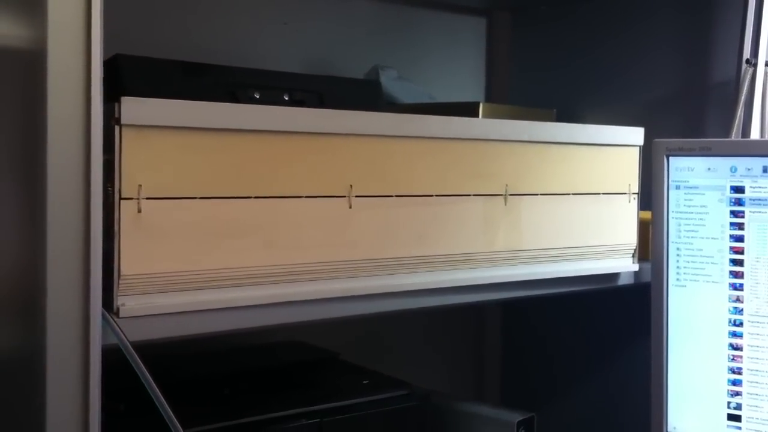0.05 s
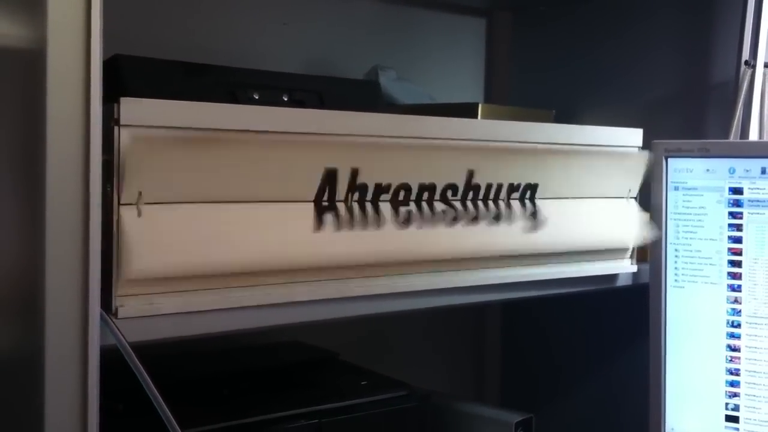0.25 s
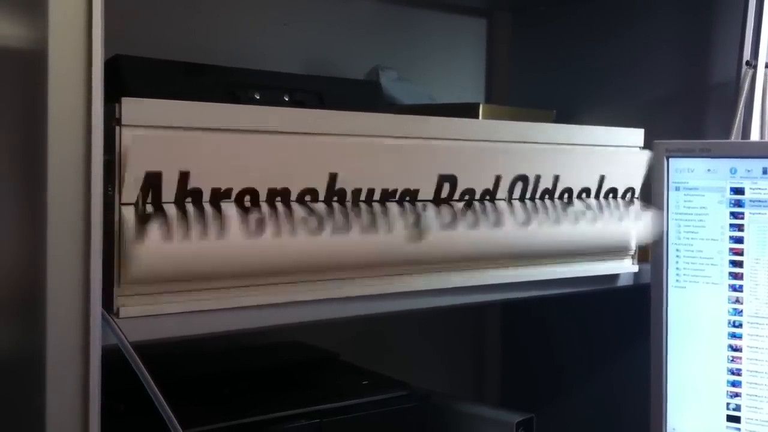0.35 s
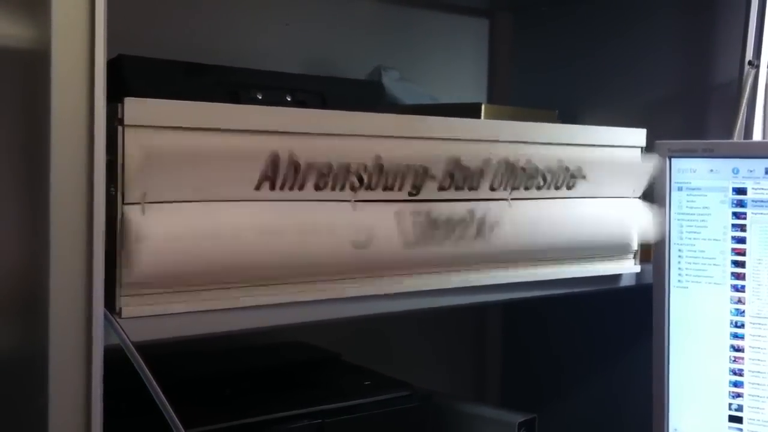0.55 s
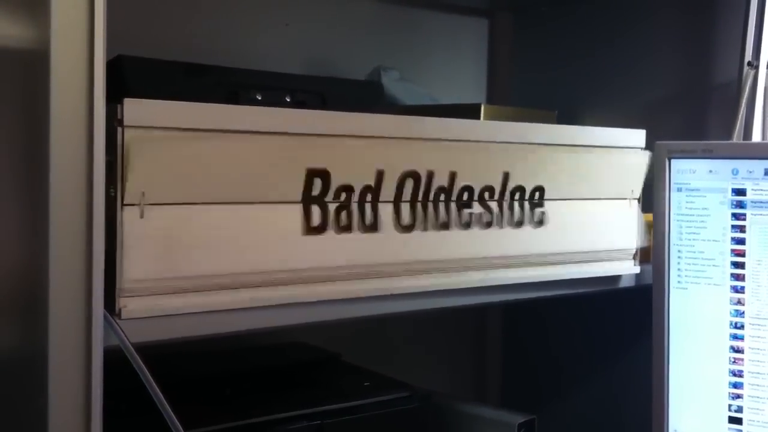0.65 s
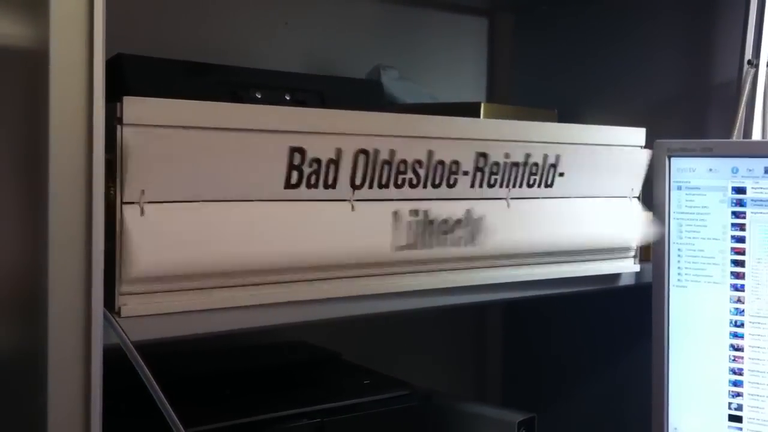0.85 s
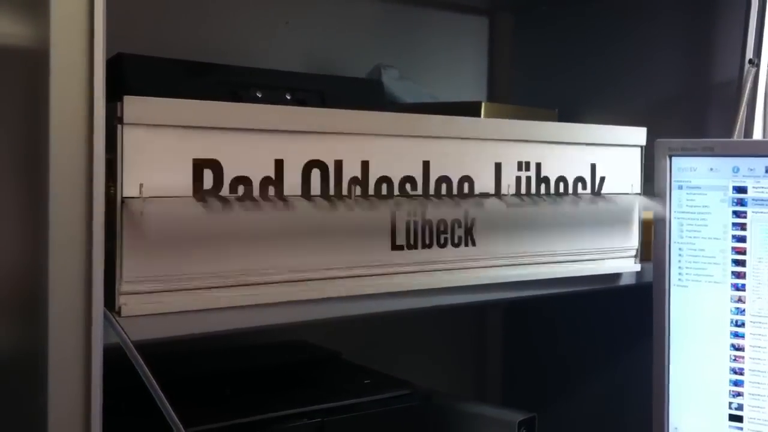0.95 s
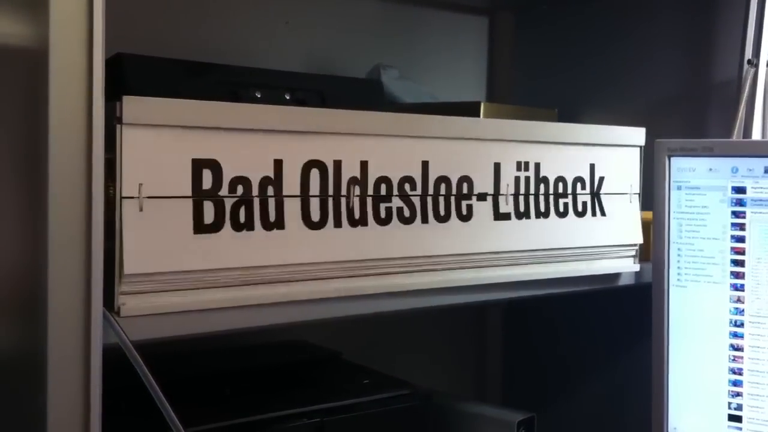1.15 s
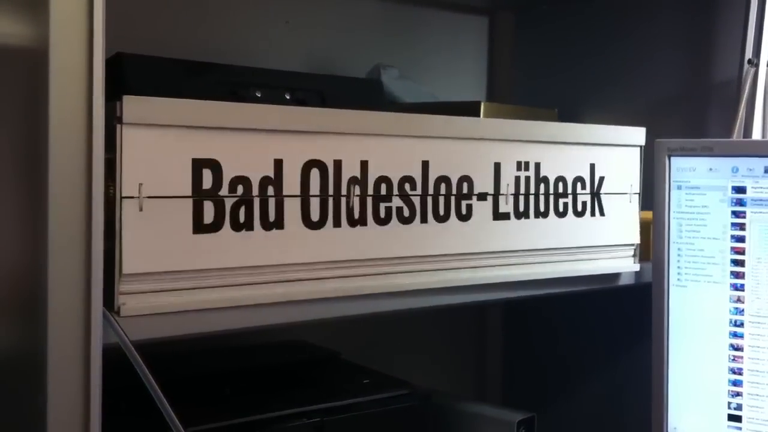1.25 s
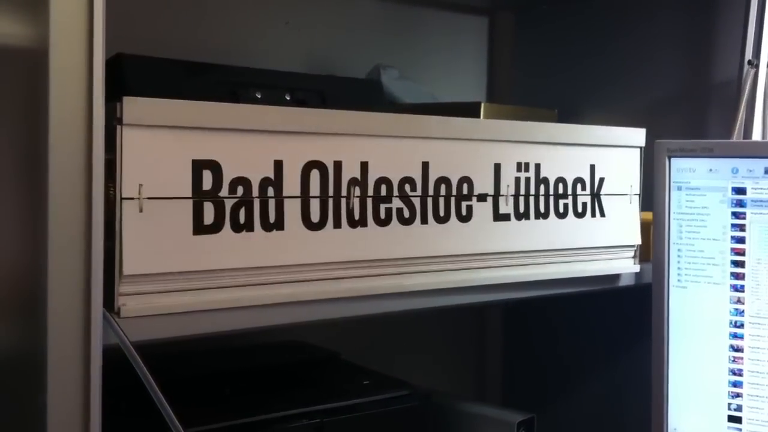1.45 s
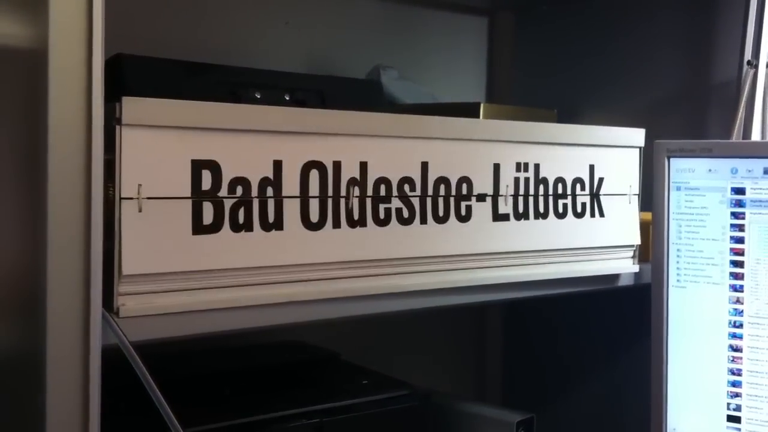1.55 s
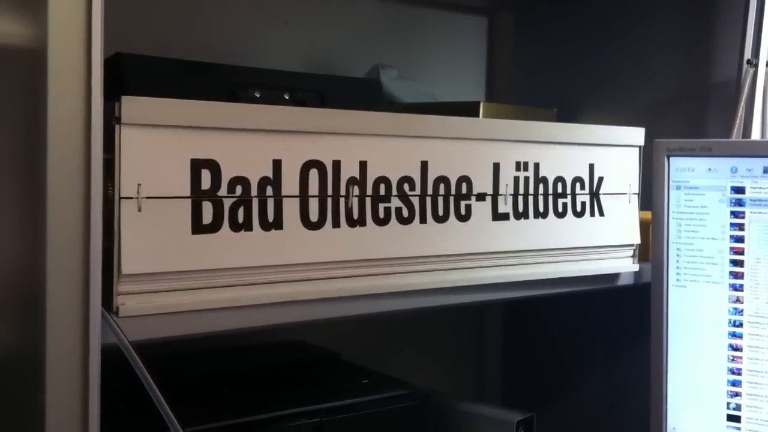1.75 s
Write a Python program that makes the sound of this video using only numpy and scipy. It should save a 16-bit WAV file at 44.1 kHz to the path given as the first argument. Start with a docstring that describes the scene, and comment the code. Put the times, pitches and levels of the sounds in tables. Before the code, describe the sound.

A split-flap sign in a quiet small room, heard close. Faint hiss until 0.2 s, then a geared motor whirrs with a fluctuating metallic ring around sharp, bright clacks and duller flap slaps, irregular, several per second, loudest near 0.4 and 0.8 s. The motor cuts at 1.0 s with a last clack and short room tail. A soft loose-flap tick follows at 1.14 s, then hiss and a barely audible low thump near 1.7 s.

```python
"""A wide split-flap sign in a quiet room runs through its flaps and stops; one loose flap settles last.
Its geared drive excites the housing modes by random tooth impacts. Sharp clacks of flaps leaving their
catches are noise bursts through resonances. Each flap slaps the stack as a swell of taps over a decaying
thud and knock. Jolts ping an upper mode, slaps push air, sparse echoes form the room, and shaped noise
with one faint thump lies behind."""
import sys
import numpy as np
from scipy import signal
from scipy.fft import rfft, irfft
from scipy.io import wavfile
from scipy.ndimage import uniform_filter1d

SR = 44100
rng = np.random.default_rng(int(sys.argv[2]) if len(sys.argv) > 2 else 0)


def to_wav(sig):
    """Store sig (one row per channel, or 1-D mono) as 16-bit WAV at the path in sys.argv[1].

    Samples outside -1..1 are clipped; the rate is SR.
    """
    pcm = np.clip(np.atleast_2d(sig), -1, 1) * 32767
    pcm = np.round(pcm).astype(np.int16)
    wavfile.write(sys.argv[1], SR, pcm.T)  # frames by channels


def magnitude_from_level(level_db):
    """Linear magnitude for a level in decibels (20 dB per decade)."""
    exponent = np.asarray(level_db, float) / 20
    return 10 ** exponent


N = 79380  # length [samples]

STEADY = 0.3  # how far a ring's level is held steady, 0-1

DRIVE_ON_S, DRIVE_OFF_S, HUM_RISE_S = 0.1823, 0.99, 0.11
TEETH_PER_S, TOOTH_SPREAD_DB = 1200, 1.5  # mean impact rate, mean excess level
WHINE_DB, GEAR_HISS_DB, HUM_DB = -37, -39, -47.5
UPPER_HZ, UPPER_WIDTH_HZ, UPPER_DB = 2142, 133, -45.5  # upper housing mode
# Ring of the lower housing modes: (time [s], level [dB])
RING_LEVEL = [(.19, -39), (0.214, -32), (0.243, -34.5), (.3, -37), (.39, -37.5), (0.436, -29.5),
              (.49, -39.5), (0.549, -44), (0.586, -25), (0.648, -50.5), (.69, -29.5), (.72, -36),
              (.83, -38.5), (.915, -35.5), (.99, -33)]
# Lower housing modes: (frequency [Hz], pole width [Hz], relative level [dB])
LOWER_MODES = [(1300, 820, -14), (1470, 31, -6.5), (1590, 37.4, -0.5), (1650, 40, -7.5)]
# Low box modes: (frequency [Hz], pole width [Hz], relative level [dB])
BOX_MODES = [(130.4, 10, 10), (181.5, 26, 16), (329, 49, 11.5), (783.4, 69, 9), (1093, 82, 2)]
# Spectrum of the gear hiss: (frequency [Hz], relative density [dB per Hz])
GEAR_HISS = [(200, -21.5), (1000, 0.5), (2500, 1.5), (4000, -9), (7000, -21), (16000, -8.5)]


def drive():
    """Forced vibration: random gear-tooth impacts excite the housing modes while the motor runs."""
    t = np.arange(N) / SR
    starting = np.clip((t - DRIVE_ON_S) / 0.0023, 0, 1)
    stopping = np.clip((DRIVE_OFF_S - t) / 0.0033, 0, 1)
    spun_up = np.clip((t - DRIVE_ON_S) / HUM_RISE_S, 0, 1) ** 2
    teeth = ticks(TEETH_PER_S, TOOTH_SPREAD_DB)
    ring_s, ring_db = np.transpose(RING_LEVEL)
    ring = magnitude_from_level(np.interp(t, ring_s, ring_db)) * modes(teeth, LOWER_MODES, STEADY)
    ring += magnitude_from_level(UPPER_DB) * modes(teeth, [(UPPER_HZ, UPPER_WIDTH_HZ, 0)])
    hum = magnitude_from_level(HUM_DB) * modes(teeth, BOX_MODES)
    hiss = magnitude_from_level(GEAR_HISS_DB) * colour(teeth, GEAR_HISS)
    return starting * stopping * (ring + magnitude_from_level(WHINE_DB) * whine(teeth) + spun_up * (hum + hiss))


FLICKER_DB, FLICKER_S = 5, 0.036  # rms level swing, averaging time of its noise
# Thin gear modes: (frequency [Hz], pole width [Hz], relative level [dB])
GEAR_MODES = [(5740, 1160, 2.5), (7060, 480, 3), (9380, 1100, 3), (14300, 540, -2.5)]


def whine(teeth):
    """Amplitude modulation: each thin gear mode flickers independently, following slow noise."""
    noise = rng.standard_normal((len(GEAR_MODES), N))
    slow = uniform_filter1d(noise, round(FLICKER_S * SR), axis=1)
    out = np.zeros(N)
    for wander, row in zip(slow, GEAR_MODES):
        out += magnitude_from_level(FLICKER_DB * evened(wander) + row[2]) * modes(teeth, [row])
    return evened(out)


PING_S = 0.0031  # time from onset to the envelope's peak
# Single jolts: (time [s], envelope peak [dB])
PINGS = [(.2385, -21.5), (.342, -22.5), (.6274, -28), (.7511, -25)]


def pings():
    """Impulse response: a jolt in the gear train strikes the upper housing mode."""
    t, out = np.arange(2000) / SR, np.zeros(N)
    envelope = t / PING_S * np.exp(1 - t / PING_S)
    for s, peak_db in PINGS:
        add(out, s, magnitude_from_level(peak_db) * envelope * np.sin(2 * np.pi * UPPER_HZ * t))
    return out


CLACK_RISE_S, CRACK_S, RATTLE_T60_S = 0.0006, 0.0092, 0.07  # the crack is 60 dB down after CRACK_S
BROAD_DB, OWN_RING_DB, RATTLE_DB = -8, -2, -13  # unpitched part, strongest ring, rattle
OWN_WIDTH_HZ = 400
# Modes of a flap: (frequency [Hz], pole width [Hz], relative level [dB])
FLAP_MODES = [(1770, 410, -7), (3460, 460, -3.5), (4995, 519, 4), (6220, 1330, 0.5), (6770, 2350, 9),
              (12040, 1400, 1)]


def clack(peak_db, ring_hz):
    """Modal resonance: a burst of contacts rings the flap, one mode more strongly, then rattles out."""
    t = np.arange(4096) / SR
    noise = rng.standard_normal(2 * len(t))  # the first half lets the resonances build up
    flap = modes(noise, FLAP_MODES, STEADY) + magnitude_from_level(BROAD_DB) * colour(noise[::-1], GEAR_HISS)
    own = magnitude_from_level(OWN_RING_DB) * modes(noise, [(ring_hz, OWN_WIDTH_HZ, 0)], STEADY)
    crack = magnitude_from_level(-60 * (t / CRACK_S) ** 2)
    rattle = magnitude_from_level(RATTLE_DB - 60 * t / RATTLE_T60_S)
    sound = (flap + own)[len(t):] * crack + flap[len(t):] * rattle
    sound *= np.minimum(t / CLACK_RISE_S, 1)
    return magnitude_from_level(peak_db) * sound / abs(sound).max()


# Flaps leaving their catches: (time [s], peak level [dB], strongest ring [Hz])
CLACKS = [(0.2248, -9.5, 5380), (0.2654, -24, 2560), (0.327, -16.5, 5120), (0.3332, -17.5, 3420),
          (0.3987, -5, 3300), (0.4597, -20, 4860), (0.51, -17.5, 6050), (0.5242, -12.5, 6820),
          (0.548, -26, 6640), (0.6186, -13.5, 5170), (0.625, -18.5, 6000), (0.7141, -15.5, 3640),
          (0.7338, -18, 6060), (0.7833, -7.5, 6515), (0.8438, -11.5, 6850), (0.874, -25, 4900),
          (0.9286, -19, 6560), (0.9395, -16.5, 2000), (0.9952, -13, 6350), (1.138, -30, 4760),
          (1.152, -31.5, 1300)]


def clacks():
    """Superposition: the separate clacks add linearly."""
    out = np.zeros(N)
    for s, peak_db, ring_hz in CLACKS:
        add(out, s, clack(peak_db, ring_hz))
    return out


TAPS_PER_S, TAP_SPREAD_DB = 3500, 2.5  # mean impact rate, mean excess level
SLAP_RISE, THUD_T60_S = 0.25, 0.11  # rise as a share of the slap's length; decay of thud and knock
# Slaps on the stack: (start [s], length [s], taps [dB], thud [dB], knock [dB])
SLAPS = [(0.219, 0.04, -24.5, -34, -30.5), (0.265, 0.029, -30, -57, -44), (0.329, 0.029, -26.5, -72, -58),
         (0.398, 0.014, -19, -33.5, -66), (0.42, 0.015, -27, -50, -68), (.455, 0.034, -29, -62, -54),
         (0.513, 0.042, -26, -37, -33), (.624, 0.036, -24, -36.5, -29.5), (0.73, 0.04, -25.5, -59, -29.5),
         (0.782, 0.012, -19.5, -38, -58), (0.834, 0.057, -33.5, -50, -57), (0.872, 0.03, -29.5, -40, -45),
         (0.938, 0.046, -27, -45, -33), (0.993, 0.016, -25, -45, -53), (1.134, 0.045, -39.5, -38.5, -46)]
# Spectrum of the taps: (frequency [Hz], relative density [dB per Hz])
SLAP_COLOUR = [(180, -13), (300, -3), (528, -15), (1690, -0.5), (2880, -7.5), (6740, -9.5), (14000, -18.5)]


def slaps():
    """Distributed impact: a flap meets the stack along its length, tapping and striking the box modes."""
    t = np.arange(8000) / SR
    swell, box = np.zeros((2, N))
    chances = rng.random((len(SLAPS), len(BOX_MODES), 2))
    for (s, length, taps_db, thud_db, knock_db), chance in zip(SLAPS, chances):
        u = t / (SLAP_RISE * length)
        add(swell, s, magnitude_from_level(taps_db) * u * np.exp(1 - u))
        thud = magnitude_from_level(thud_db) * struck(t, BOX_MODES[:3], chance)
        knock = magnitude_from_level(knock_db) * struck(t, BOX_MODES[3:], chance[3:])
        dying = magnitude_from_level(-60 * t / THUD_T60_S) * np.minimum(u, 1)
        add(box, s, dying * (thud + knock))
    return swell * colour(ticks(TAPS_PER_S, TAP_SPREAD_DB), SLAP_COLOUR) + box


PITCH_SPREAD = 0.1  # random pitch variation of each box mode from slap to slap, as a share


def struck(t, table, chance):
    """Modal superposition: one blow sounds the box modes as sines of random phase and varied pitch."""
    out = np.zeros(len(t))
    for (hz, _, db), (draw, phase) in zip(table, chance):
        varied_hz = hz * (1 + PITCH_SPREAD * (2 * draw - 1))
        out += magnitude_from_level(db) * np.sin(2 * np.pi * (varied_hz * t + phase))
    return evened(out)


PUFF_DB, PUFF_S = -15, 0.0015  # scale against the slap's thud, time constant


def puffs():
    """Volume displacement: each slap pushes out air as a deep two-sided pulse."""
    u, out = np.arange(8000) / SR / PUFF_S, np.zeros(N)
    for s, _, _, thud_db, _ in SLAPS:
        add(out, s, magnitude_from_level(thud_db + PUFF_DB) * (1 - u) * u * np.exp(1 - u))
    return out


def room(x):
    """Reverberation by convolution: two echo patterns crossfaded in rotation, for a smooth tail."""
    turn = 2 * np.pi * 11 * np.arange(N) / SR  # 11 Hz
    return sum(signal.fftconvolve(x * share, echoes())[:N] for share in (np.sin(turn), np.cos(turn)))


FIRST_ECHO_S = 0.0044  # the echoes then fade in over as long again
# Decay of the room: (frequency [Hz], T60 [s])
ROOM_T60 = [(150, 0.46), (400, 0.56), (1040, 0.31), (2760, 0.37), (7280, 0.21)]


def echoes():
    """Exponential decay: sparse echoes of random sign, each band dying at its own speed."""
    taps = np.zeros(SR)
    at = np.arange(0, SR - 20, 20)
    taps[at + rng.integers(0, 20, len(at))] = rng.choice([-1., 1.], len(at))
    hz, t, bands = signal.stft(taps, SR, nperseg=256)
    decay = magnitude_from_level(-60 * t / read(ROOM_T60, hz)[:, None])
    tail = signal.istft(bands * decay, SR, nperseg=256)[1]
    tail *= np.clip(np.arange(len(tail)) / SR / FIRST_ECHO_S - 1, 0, 1)
    return tail / np.linalg.norm(tail)


FLOOR_DB = -60
# Spectrum of the steady hiss: (frequency [Hz], relative density [dB per Hz])
FLOOR = [(25, -38), (60, -19), (100, -8.5), (259, -6.5), (726, -7), (2270, -9.5), (15200, -24),
         (16500, -13.5)]
# A faint low thump elsewhere: (start [s], rise [s], level [dB])
FAR_THUMP = (1.705, 0.032, -62.5)


def background():
    """Stationary noise: steady room and microphone hiss, with one faint thump of resonant noise."""
    s, rise_s, db = FAR_THUMP
    u = np.maximum(np.arange(N) / SR - s, 0) / rise_s
    swell = u ** 2 * np.exp(2 - 2 * u)
    thump = magnitude_from_level(db) * swell * modes(rng.standard_normal(N), [(217, 125, 0)])
    return magnitude_from_level(FLOOR_DB) * colour(rng.standard_normal(N), FLOOR) + thump


def ticks(per_s, spread_db):
    """Random point process: small impacts of either sign, a few large."""
    size = magnitude_from_level(spread_db * np.minimum(rng.exponential(1, N), 4)) * rng.choice([-1., 1.], N)
    return size * (rng.random(N) < per_s / SR)


def modes(x, table, steady=0):
    """Modal synthesis: a sum of steep double-pole resonances at set relative rms levels, evened."""
    out = np.zeros(len(x), complex)
    for hz, width_hz, db in table:
        pole = np.exp((-np.pi * width_hz + 2j * np.pi * hz) / SR)
        ring = signal.lfilter([1], np.poly([pole, pole]), x)
        out += magnitude_from_level(db) * ring / np.sqrt(np.mean(abs(ring) ** 2))
    held = out / (abs(out) + 1e-9) ** np.clip(steady, 0, 1)  # compresses the envelope
    return evened(held.imag)


def colour(x, points):
    """Linear filtering: weights the spectrum by a table, then evens."""
    gain = magnitude_from_level(read(points, np.fft.rfftfreq(len(x), 1 / SR)))
    return evened(irfft(rfft(x) * gain, len(x)))


def read(points, hz):
    """Interpolation: reads a table on a log-frequency axis."""
    f, value = np.transpose(points)
    return np.interp(np.log(hz + 1), np.log(f + 1), value)


def evened(x):
    """Normalization: scales to rms 1."""
    return x / np.sqrt(np.mean(x ** 2) + 1e-20)


def add(mix, s, sound):
    """Superposition: mixes a sound in at time s."""
    part = mix[round(s * SR):][:len(sound)]
    part += sound[:len(part)]


ROOM_DB, MIC_LOW_HZ = -5.5, 113


def scene():
    """Superposition: sign and echoes, high-passed as by a small microphone, then puffs and background."""
    sign = drive() + pings() + slaps() + clacks()
    high_pass = signal.butter(4, MIC_LOW_HZ, "high", fs=SR, output="sos")
    near = signal.sosfilt(high_pass, sign + magnitude_from_level(ROOM_DB) * room(sign))
    return (near + puffs() + background())[None]


def top_cut(x):
    """Nothing passes above the cut-off."""
    return signal.sosfilt(signal.butter(12, 16970, fs=SR, output="sos"), x)


EDGE_HZ = 15900


def record(dry):
    """Band limitation: a linear-phase low-pass bounds the finished mix."""
    low_pass = signal.firwin(255, EDGE_HZ, window=("kaiser", 5), fs=SR)
    mix = signal.oaconvolve(dry, low_pass[None], "same")
    return top_cut(mix)


dry = scene()
out = record(dry)
to_wav(out)
```